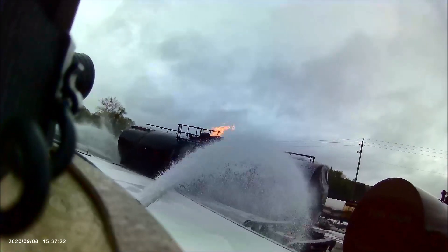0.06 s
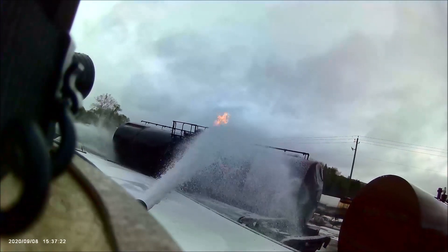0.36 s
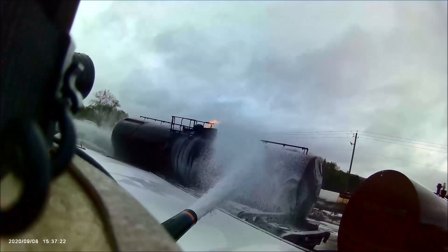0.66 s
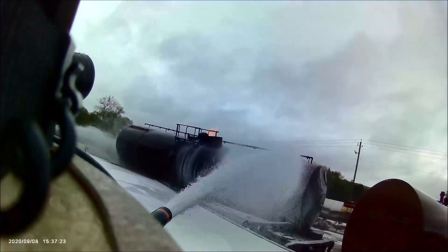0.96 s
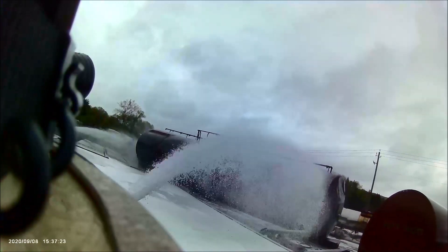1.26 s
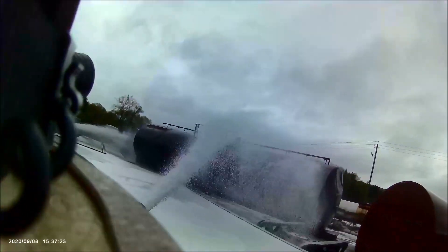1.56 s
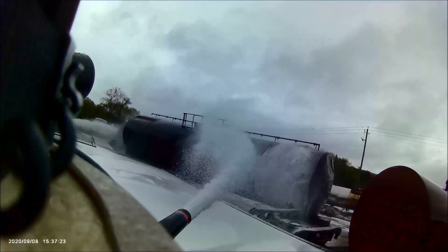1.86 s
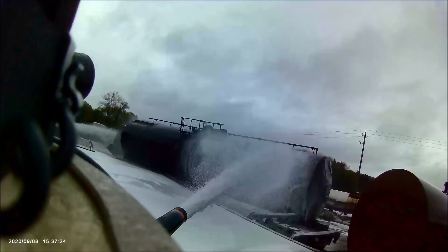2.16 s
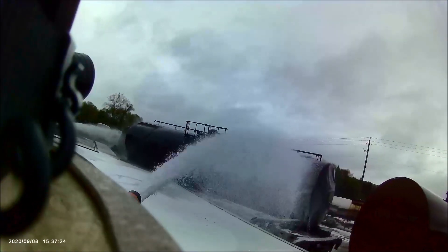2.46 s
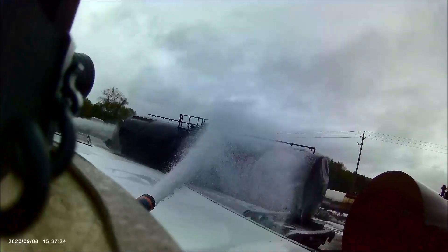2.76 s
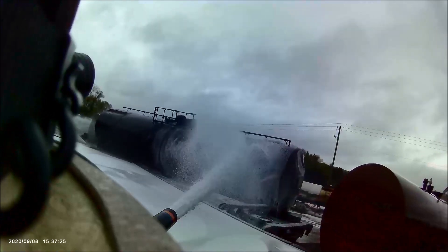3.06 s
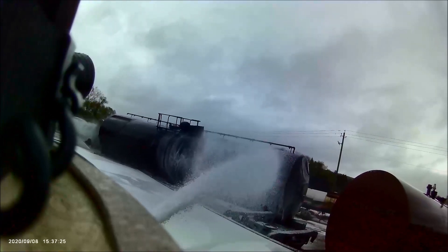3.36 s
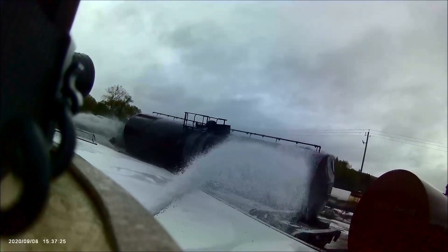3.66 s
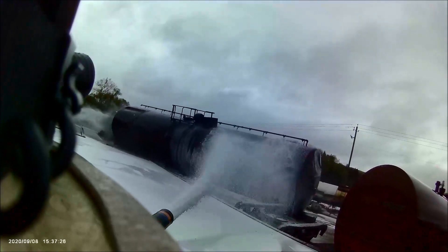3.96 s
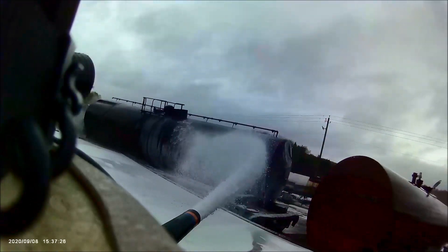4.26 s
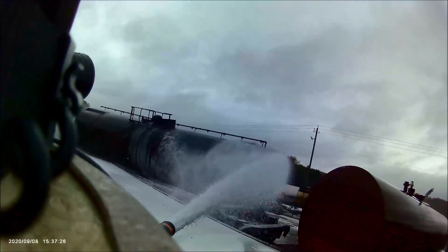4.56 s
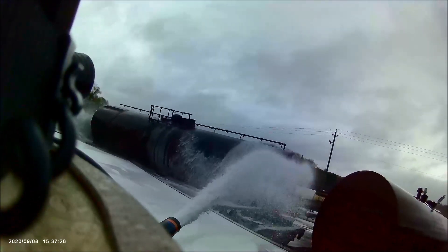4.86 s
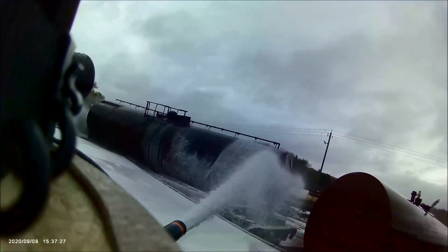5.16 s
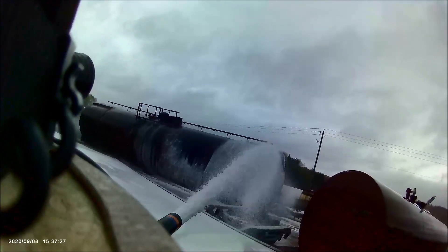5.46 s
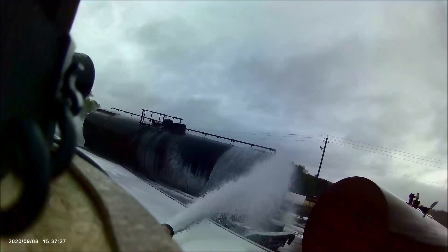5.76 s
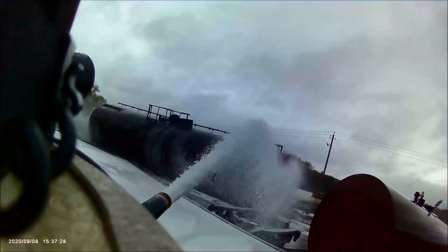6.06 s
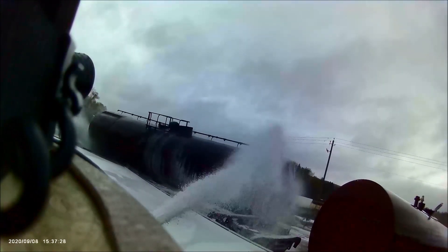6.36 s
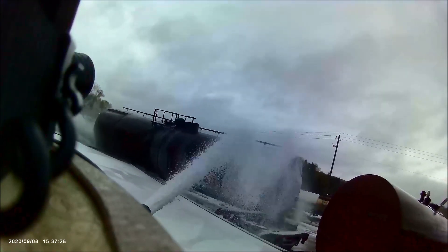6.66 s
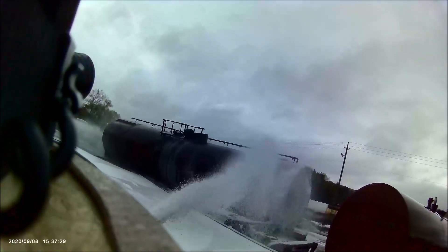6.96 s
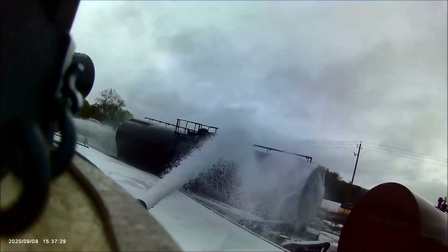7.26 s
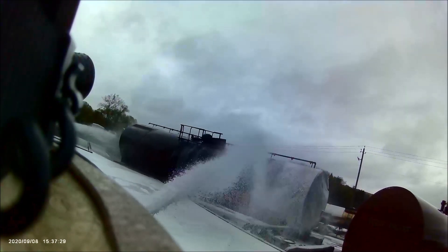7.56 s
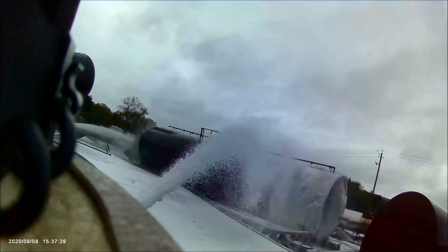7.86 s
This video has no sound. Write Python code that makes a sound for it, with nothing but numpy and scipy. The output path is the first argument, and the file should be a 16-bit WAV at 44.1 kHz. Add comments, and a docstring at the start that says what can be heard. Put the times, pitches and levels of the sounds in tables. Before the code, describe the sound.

A fire hose jet hisses and sprays onto a steel tank over a steady pump engine drone and a low rumble.

```python
"""Fire hose on a steel tanker

A hose plays on a rail tanker at an outdoor training ground, heard from beside the nozzle. The pump
engine's firings make a drone, a restless hum wavers above it, and turbulence rumbles in the hose.
The jet hisses, and the impacts of its spray on the steel swell with each sweep. Early on a gust
buffets the microphone and friction in the wet gear gives a few small squeaks."""
import sys
import numpy as np
from scipy import signal
from scipy.fft import rfft, irfft
from scipy.io import wavfile
from scipy.ndimage import uniform_filter1d

SR = 44100
rng = np.random.default_rng(int(sys.argv[2]) if len(sys.argv) > 2 else 0)


def generate_wav(sig):
    """Save sig (samples, or channels by samples) to the path in sys.argv[1] as 16-bit PCM at SR."""
    pcm = np.round(np.clip(np.atleast_2d(sig).T, -1, 1) * 32767).astype(np.int16)
    wavfile.write(sys.argv[1], SR, pcm)


N = 349272
T = np.arange(N) / SR
FREQS = np.maximum(np.fft.rfftfreq(N, 1 / SR), 1)

# Load on the pump engine: time_s, relative_db
ENGINE_LOAD = [(0, -18.5), (2.1, -20), (3.0, -19), (4.6, -19), (6.0, -21), (7.9, -20)]
# Harmonics of the firing rate: harmonic_number, relative_db
ENGINE_HARMONICS = [(1, -2), (2, -21), (3, -25.5), (4, -26.5)]
# Surges of the hum: time_s, peak_db
HUM_SURGES = [(0.11, -20.5), (1.1, -19), (2.25, -21.5), (5.39, -19), (6.41, -18.5)]
# Turbulent water in the hose: frequency_hz, relative_db
RUMBLE_SPECTRUM = [(20, -10.5), (45, -4), (85, -3), (120, 0.5), (165, 1.5), (205, -3), (275, -3.5),
                   (330, -9.5), (400, -12), (470, -19.5), (700, -25.5), (1100, -50.5), (2500, -70.5)]
# Sweeps of the jet across the tank: start_s, length_s, spray_rise_db, rush_rise_db, nozzle_rise_db
JET_SWEEPS = [(-0.3, 0.3, 5, 1, .3), (.95, .6, 7, 0.5, 1.2), (2.9, 0.39, 7.5, 1.5, 0),
              (4.618, 0.56, 6, 0.3, 0.4), (6.2, 0.39, 6, 2, 0.5), (7.622, .4, 6, .3, -0.2)]
# Broad rush of the jet: frequency_hz, relative_db
RUSH_SPECTRUM = [(300, -1.5), (550, 7.5), (750, 2), (950, 1), (1400, -1.5), (1700, 3), (2200, -1.5),
                 (2550, -3.5), (3050, -2), (3500, -17), (3800, -17.5), (4300, -6), (4600, -21.5),
                 (8000, -31)]
# Hollow resonances in the rush: centre_hz, half_width_hz
RESONANCES = [(1925, 105), (2860, 35)]
# Strength of the two resonances: time_s, lower_relative_db, upper_relative_db
RESONANCE_LEVELS = [(0, 2, -11), (2.3, -1.5, -15), (4.9, 1, -10.5), (5.35, 2, -4.5), (6.5, 2, -9),
                    (7.4, 0.5, -4.5), (7.9, -3, -8)]
# Spray on steel: frequency_hz, relative_db
SPRAY_SPECTRUM = [(1500, -12.5), (3600, -13.5), (4300, -10), (4580, 3), (4790, 4), (4930, 0.5), (5200, 3.5),
                  (5480, 10.5), (5800, -3), (6500, -7.5), (8000, -21)]
# Thin hiss at the nozzle: frequency_hz, relative_db
NOZZLE_SPECTRUM = [(4000, -68), (5200, -35.5), (5700, -12), (6100, -7), (6500, -1.5), (6800, 3.5),
                   (7150, -5), (7550, -11), (7900, -21), (8250, -45)]
# Brief dips in the hiss: centre_s, length_s
HISS_DIPS = [(.345, 0.017), (0.516, 0.016), (0.761, 0.027), (.92, .013), (2.108, .015), (2.806, 0.034),
             (3.213, .03), (3.5, 0.017), (3.927, .012), (4.458, 0.019), (4.574, 0.017), (4.783, 0.028),
             (6.125, 0.02), (6.807, .013)]
# One strong eddy in the gust: centre_s, rocking_hz, half_length_s, peak_db
GUST_EDDY = (.285, 23, .017, 2.3)
# Squeaks of the gear: centre_s, start_hz, end_hz, half_length_s, level_db
GEAR_SQUEAKS = [(0.132, 1230, 1030, 0.0055, -28), (0.143, 648, 514, 0.0053, -29),
                (0.365, 1236, 1100, 0.0038, -35), (0.969, 561, 600, .005, -33),
                (1.073, 1270, 1200, 0.0063, -31), (1.075, 500, 430, 0.006, -22),
                (1.55, 760, 600, .005, -32)]


def undb(db):
    """Amplitude ratio for a level in decibels."""
    return 10 ** (np.asarray(db) / 20)


def unit(x):
    """Normalisation to rms 1."""
    return x / np.sqrt(np.mean(x ** 2))


def curves(table):
    """Linear interpolation of each column over time."""
    times, *columns = np.transpose(table)
    return [np.interp(T, times, column) for column in columns]


def pulse(centre_s, half_length_s):
    """A Gaussian envelope of height 1."""
    return np.exp(-((T - centre_s) / half_length_s) ** 2 / 2)


def wander(rate_hz):
    """Random modulation: held values, smoothed twice to a spread near 1."""
    hold = int(SR / rate_hz)
    steps = np.repeat(rng.standard_normal(N // hold + 1), hold)
    return 1.3 * uniform_filter1d(uniform_filter1d(steps, hold), hold)[:N]


def colour(x, spectrum):
    """Filtering by a spectral envelope; rms 1."""
    hz, db = np.transpose(spectrum)
    shape_db = np.interp(np.log(FREQS), np.log(hz), db)
    return unit(irfft(rfft(x) * undb(shape_db), N))


def slow_noise(top_hz):
    """Low-pass filtered noise; rms 1."""
    return unit(irfft(rfft(rng.standard_normal(N)) / (1 + (FREQS / top_hz) ** 4), N))


def pump(firing_hz=65.53, drift_hz=0.24, gain_db=1.25, throb_db=0.5):
    """Periodic firings at a governed speed form a harmonic series; the silencer weakens its overtones."""
    load_db, = curves(ENGINE_LOAD)
    phase = 2 * np.pi * np.cumsum(firing_hz + drift_hz * wander(5)) / SR
    tone = sum(undb(db) * np.sin(k * phase + 2 * np.pi * rng.random()) for k, db in ENGINE_HARMONICS)
    return unit(tone) * undb(load_db + gain_db + throb_db * wander(18))


def hum(pitch_hz=165.9, waver_hz=9, level_db=-27.7, restless_db=2.0, roughness=0.35):
    """Frequency and amplitude modulation make a pure tone waver, flutter and at times surge."""
    strength = undb(level_db + restless_db * wander(11))
    for time_s, peak_db in HUM_SURGES:
        strength = np.maximum(strength, undb(peak_db) * pulse(time_s, half_length_s=0.047))
    phase = 2 * np.pi * np.cumsum(pitch_hz + waver_hz * wander(25)) / SR
    flutter = 1 + roughness * slow_noise(top_hz=22)
    return unit(np.sin(phase) * flutter) * strength


def hose(level_db=-22.5, surge_db=0.4):
    """Turbulence in the hose and nozzle makes a low rumble that surges a little."""
    return colour(rng.standard_normal(N), RUMBLE_SPECTRUM) * undb(level_db + surge_db * wander(12))


def sweeps(attack_s=0.11, release_s=0.25):
    """Trapezoidal envelopes in dB for spray, rush and nozzle: the jet meets the tank, stays, leaves."""
    rise_db = np.zeros((3, N))
    for start_s, length_s, *peaks_db in JET_SWEEPS:
        arriving = (T - start_s) / attack_s
        leaving = 1 - (T - start_s - length_s) / release_s
        rise_db += np.outer(peaks_db, np.clip(np.minimum(arriving, leaving), 0, 1))
    return rise_db


def droplets(per_s, spread_db):
    """Shot noise: a dense shower of independent impacts of random size; rms 1."""
    hits = rng.random(N) < per_s / SR
    impacts = hits * rng.standard_normal(N)
    size_db = spread_db * np.minimum(rng.exponential(size=N), 5)
    return unit(impacts * undb(size_db))


def hollow_rings():
    """Resonance picks two bands out of noise; the upper grows as the aim shifts along the tank."""
    out = np.zeros(N)
    for (centre_hz, half_width_hz), db in zip(RESONANCES, curves(RESONANCE_LEVELS)):
        detuning = (FREQS - centre_hz) / half_width_hz
        band = irfft(rfft(rng.standard_normal(N)) / (1 + detuning ** 2), N)
        out += unit(band) * undb(db)
    return out


def dips(hiss, band_hz=(750, 5800), dip_db_per_s=-1000, flickers_per_s=1.2, flicker_s=0.016):
    """Brief attenuation of the middle band: longer dips go deeper, and flickers fall at random."""
    events = [(centre_s, length_s, dip_db_per_s * length_s) for centre_s, length_s in HISS_DIPS]
    draws = rng.random((int(flickers_per_s * N / SR), 2))
    events += [(at * N / SR, flicker_s, -9 * (0.5 + size)) for at, size in draws]  # about 9 dB deep
    gain_db = np.zeros(N)
    for centre_s, length_s, depth_db in events:
        near = np.abs(T - centre_s) < 2 * length_s
        gain_db[near] += depth_db * np.exp(-(2 * (T[near] - centre_s) / length_s) ** 6)
    middle = signal.sosfiltfilt(signal.butter(8, band_hz, "bandpass", fs=SR, output="sos"), hiss)
    return hiss - middle * (1 - undb(gain_db))


def jet(rush_db=-37.5, ring_db=-45.0, spray_db=-50.5, nozzle_db=-33.5,
        flutter_db=0.85, sputter_db=0.7, sway_db=0.31):
    """Jet breakup: the stream hisses at the nozzle, tears into drops and patters on the steel."""
    spray_rise, rush_rise, nozzle_rise = sweeps()
    breakup = flutter_db * wander(30)  # lumps in the stream move rush and spray together
    swell = rush_rise + sway_db * wander(3)  # the hand-held nozzle is never quite still
    rush = colour(droplets(per_s=30000, spread_db=1), RUSH_SPECTRUM)
    rush *= undb(rush_db + swell + breakup)
    hollow = hollow_rings() * undb(ring_db + swell)
    spray = colour(droplets(per_s=13000, spread_db=-0.5), SPRAY_SPECTRUM)
    spray *= undb(spray_db + spray_rise + breakup)
    nozzle = colour(rng.standard_normal(N), NOZZLE_SPECTRUM)
    nozzle *= undb(nozzle_db + nozzle_rise + sway_db * wander(4.5) + sputter_db * wander(60))
    return dips(rush + spray + nozzle) + hollow


def wind(breeze_db=-36.5, gust_db=-15.5, peak_s=0.2, attack_s=0.14, decay_s=0.5):
    """Pressure fluctuations on the microphone: a steady breeze, a gust and one strong eddy."""
    since_peak = T - peak_s
    gust = undb(gust_db) * np.exp(-np.maximum(-since_peak / attack_s, since_peak / decay_s))
    centre_s, rocking_hz, half_length_s, eddy_db = GUST_EDDY
    eddy = -np.cos(2 * np.pi * rocking_hz * (T - centre_s)) * pulse(centre_s, half_length_s)
    return slow_noise(top_hz=41) * (undb(breeze_db) + gust) + undb(eddy_db) * eddy


def squeaks(roughness=0.66):
    """Friction in the wet gear excites short, scratchy tones, most of them falling in pitch."""
    scratch = 1 + roughness * slow_noise(top_hz=250)
    tones = np.zeros(N)
    for centre_s, start_hz, end_hz, half_length_s, level_db in GEAR_SQUEAKS:
        pitch_hz = np.interp(T, [centre_s - half_length_s, centre_s + half_length_s], [start_hz, end_hz])
        phase = 2 * np.pi * np.cumsum(pitch_hz) / SR
        tones += undb(level_db) * pulse(centre_s, half_length_s) * np.sin(phase)
    return tones * scratch


def scene():
    """Superposition in a free field: close sources add in the open air, without echoes."""
    return (pump() + hum() + hose() + jet() + wind() + squeaks())[None]


def record(dry, cutoff_hz=8180):
    """Clipping at full scale, then a steep low-pass filter that removes the high treble."""
    lowpass = signal.ellip(12, 0.2, 80, cutoff_hz, fs=SR, output="sos")
    return signal.sosfilt(lowpass, np.clip(dry, -1, 1))


dry = scene()
out = record(dry)
generate_wav(out)
```